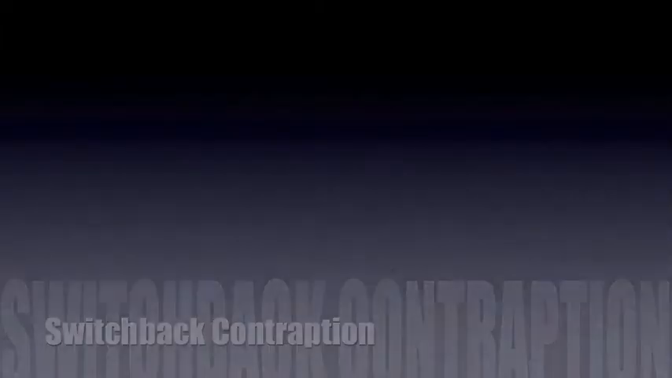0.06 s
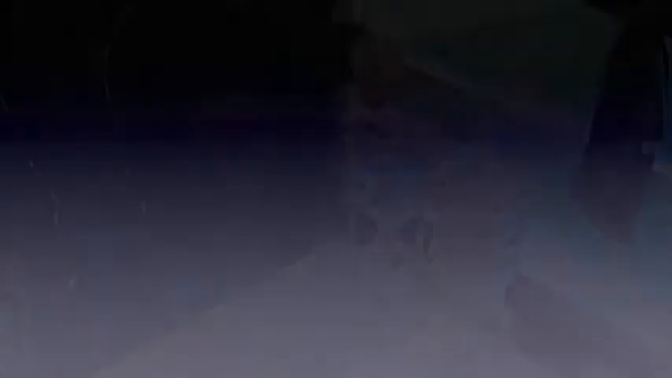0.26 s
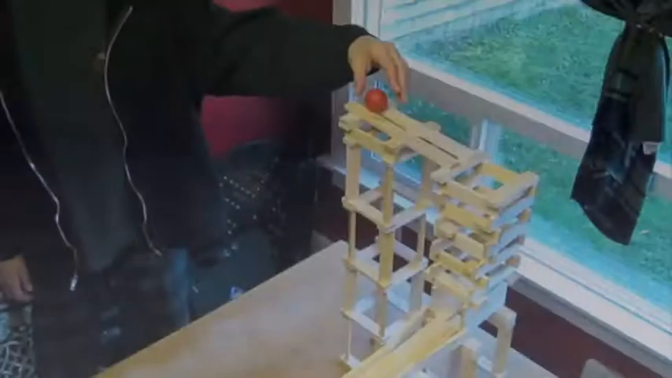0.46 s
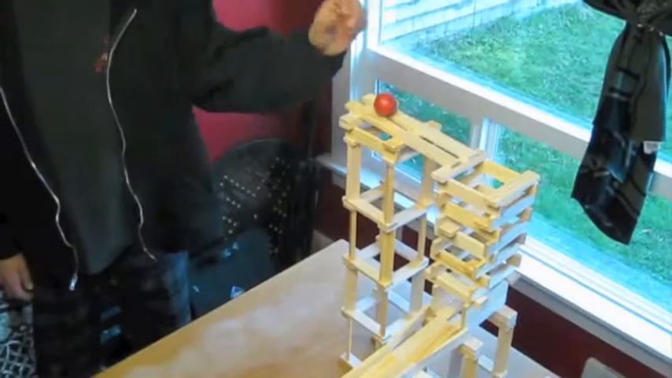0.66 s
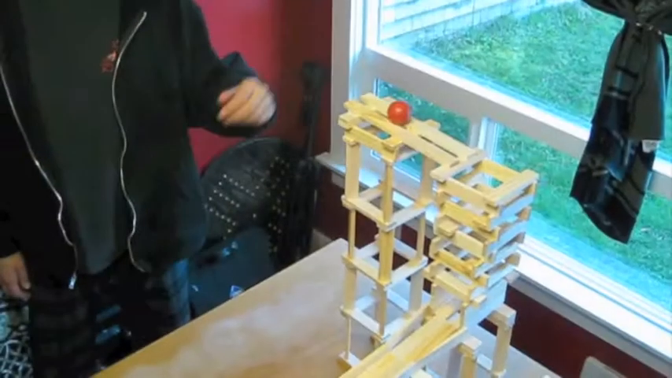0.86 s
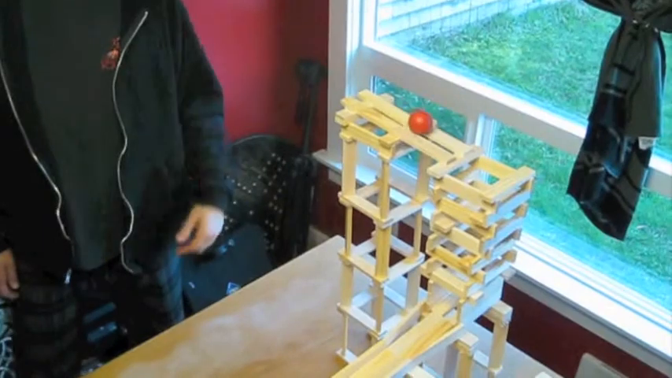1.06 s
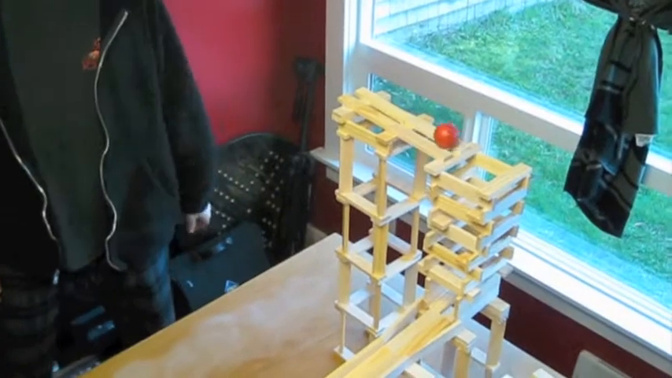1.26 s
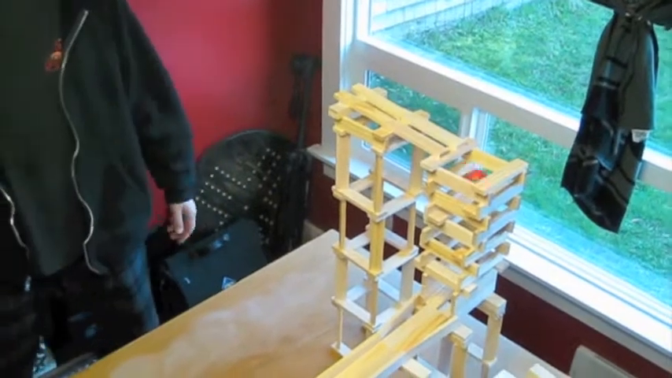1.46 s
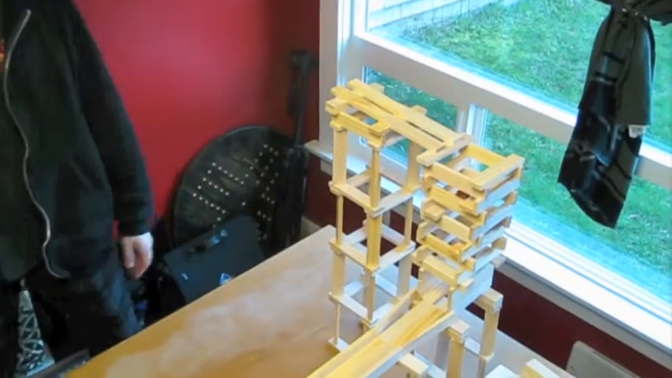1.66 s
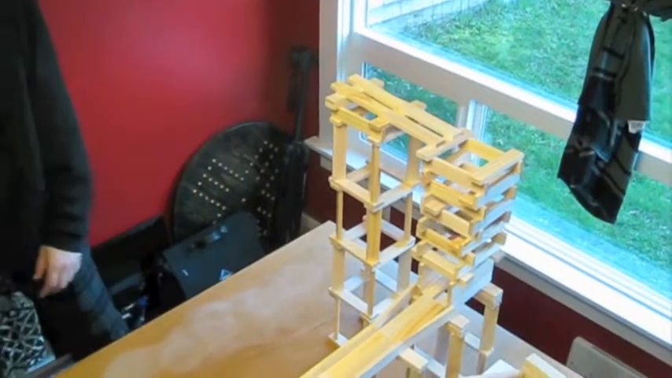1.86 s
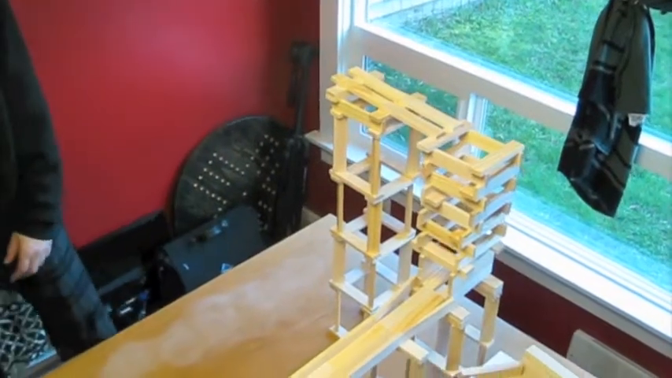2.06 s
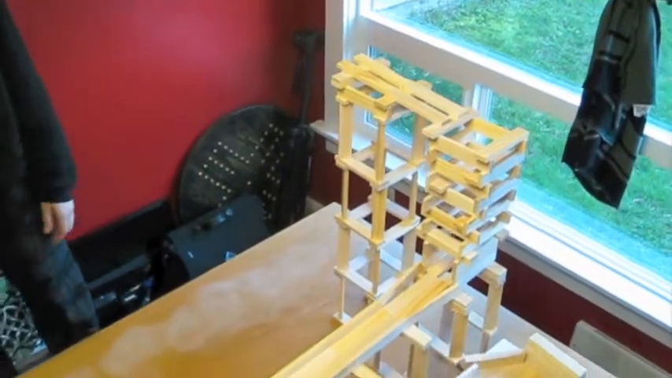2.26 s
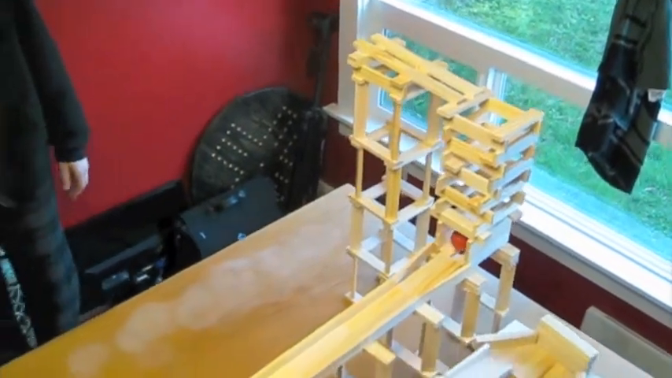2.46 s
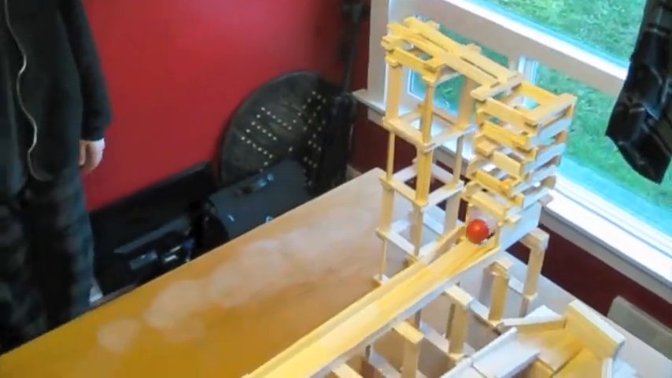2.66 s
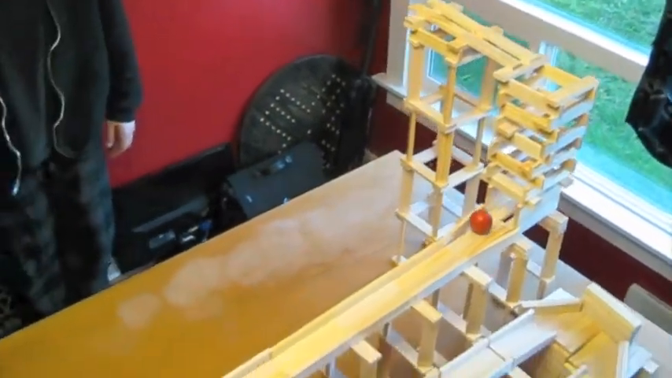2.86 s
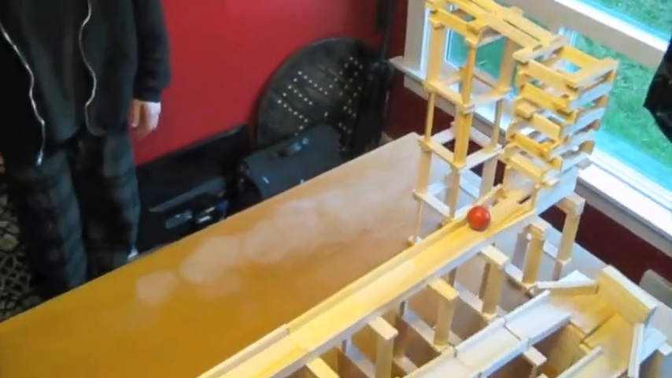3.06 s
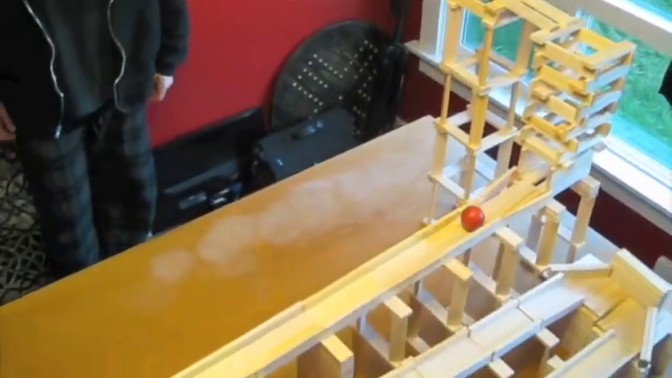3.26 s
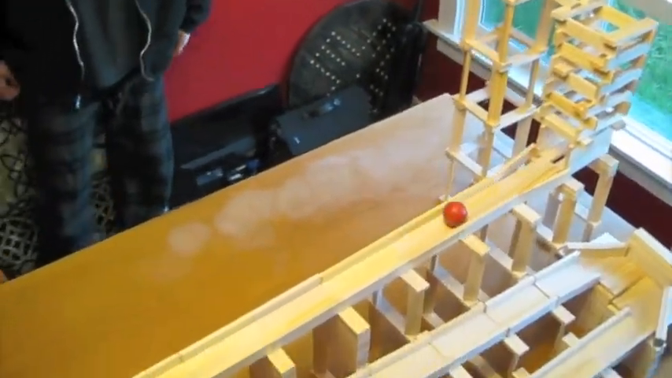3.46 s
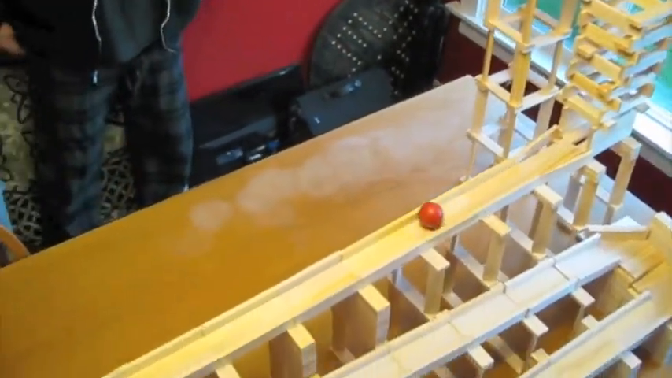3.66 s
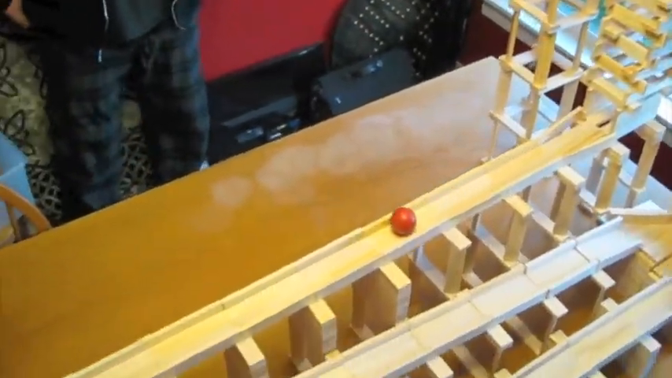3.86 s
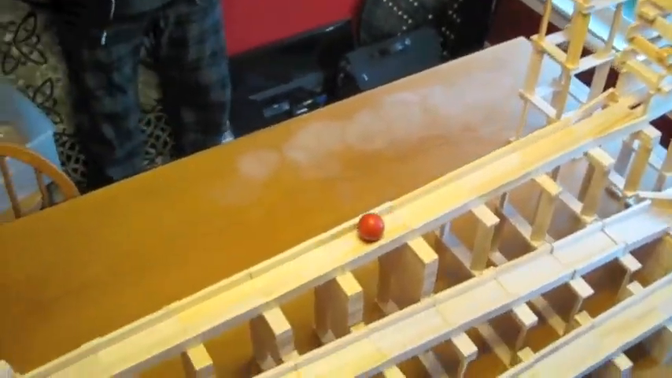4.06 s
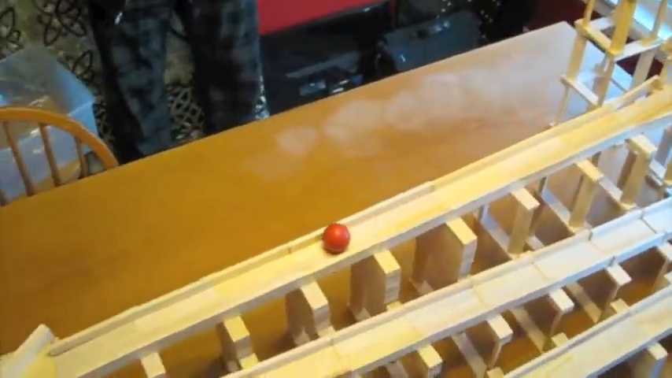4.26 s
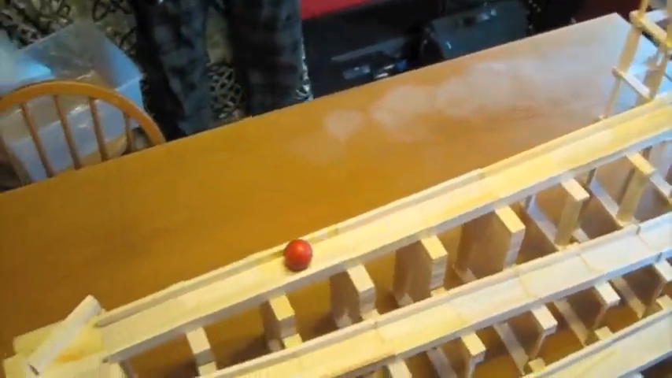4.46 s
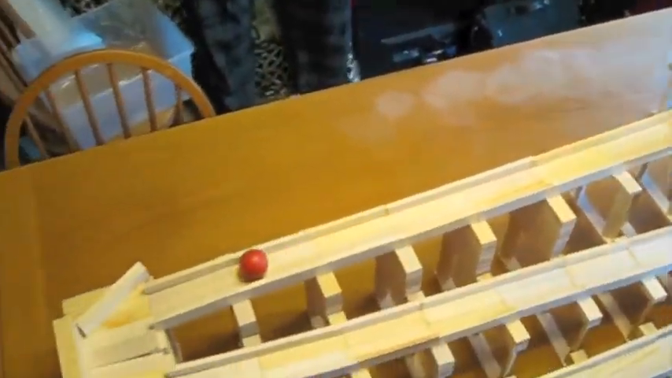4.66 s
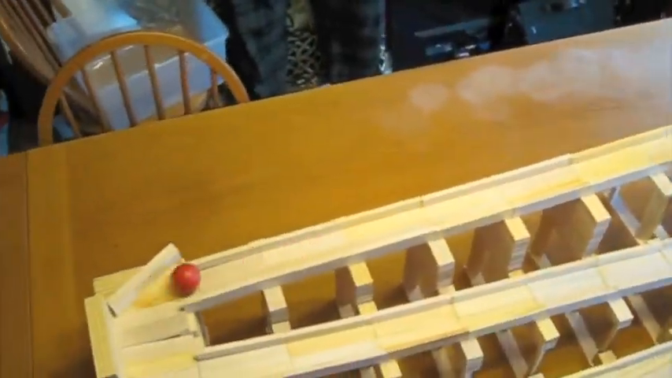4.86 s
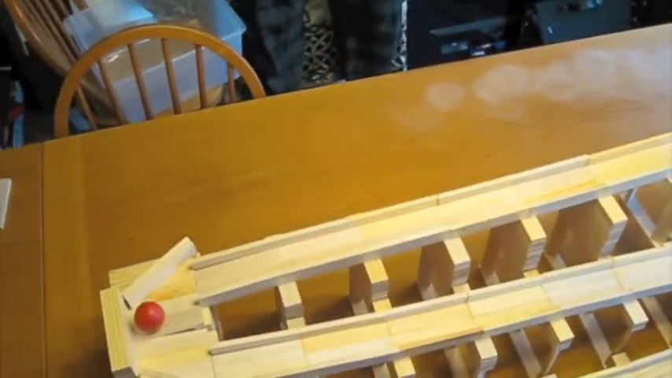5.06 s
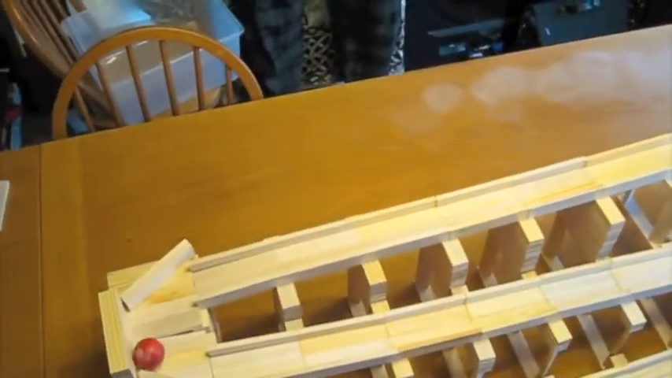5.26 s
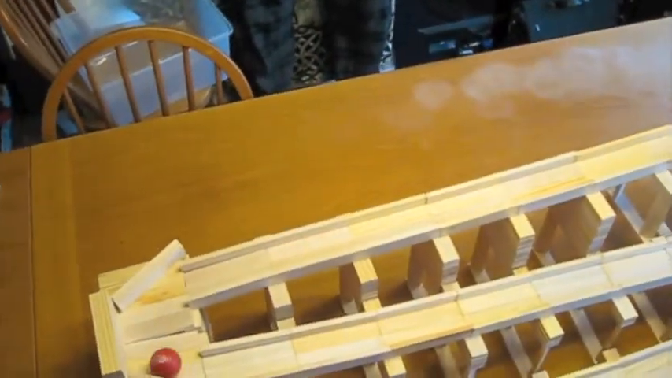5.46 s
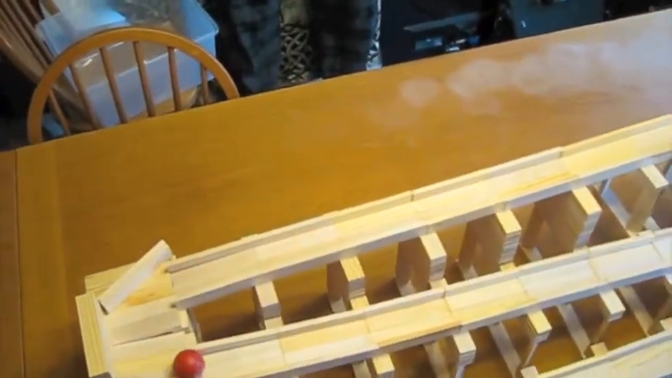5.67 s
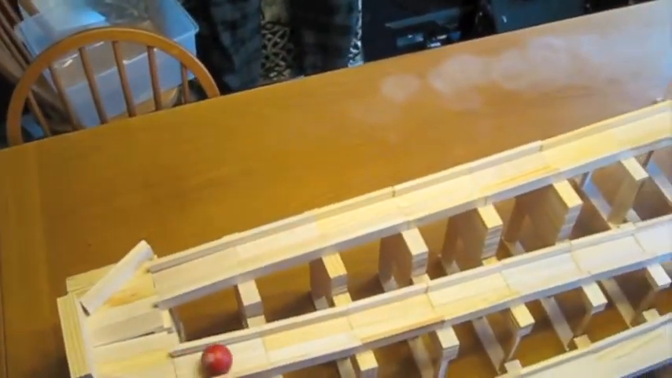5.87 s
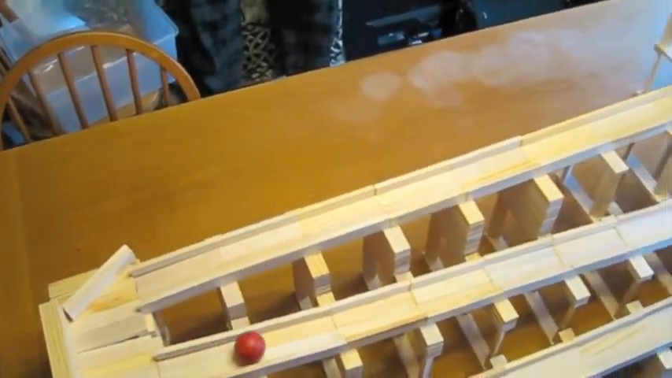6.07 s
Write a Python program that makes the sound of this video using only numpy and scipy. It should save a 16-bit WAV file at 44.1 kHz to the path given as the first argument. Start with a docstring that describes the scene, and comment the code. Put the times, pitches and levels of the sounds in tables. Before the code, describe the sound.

Sharp wooden clacks tumble quickly from shelf to shelf, bounce to rest, then a rumbling roll with knocks crosses a long plank track indoors.

```python
"""Faint hum and hiss fade in from near silence, with one tiny tick as a hand lets go of a small hard ball.
It drops from shelf to shelf down a tower of loose planks, bounces to rest, then rolls down a long ramp,
ticking over the joints, rebounds round a corner and rolls on. Each blow is a filtered noise click plus
a decaying noise tail for the small furnished room; loose planks add damped sines, and rolling is dense
random bumps through the ramp's colour."""
import sys
import numpy as np
from scipy import signal
from scipy.fft import rfft, irfft, next_fast_len
from scipy.io import wavfile
from scipy.ndimage import map_coordinates

SR = 44100
rng = np.random.default_rng(int(sys.argv[2]) if len(sys.argv) > 2 else 0)


def to_wav(sig):
    """Store sig (one row per channel, or 1-D mono) as 16-bit WAV at the path in sys.argv[1].

    Samples outside -1..1 are clipped; the rate is SR.
    """
    pcm = np.clip(np.atleast_2d(sig), -1, 1) * 32767
    pcm = np.round(pcm).astype(np.int16)
    wavfile.write(sys.argv[1], SR, pcm.T)  # frames by channels


N = 269010
SIZE = 16384  # samples in one pulse, tail or ring
FLIGHT_S = 0.0026  # travel time through the air to the microphone

# rolling level over time, shared by rumble and rail ticks: time_s, level_db
ROLL_LEVEL = [(.8, -67), (1.1, -57), (1.45, -65), (2.7, -58.5), (3.1, -62.5), (4.0, -49.5), (4.5, -47),
              (4.9, -49.5), (5.07, -41.5), (5.5, -66.5), (5.8, -65), (6.1, -60)]


def amp(db):
    """Decibels to gain."""
    return 10 ** (np.asarray(db) / 20)


def unit(x):
    """Scale to rms 1."""
    return x / np.sqrt(np.mean(x ** 2) + 1e-20)


def along(points, hz):
    """(Hz, value) points interpolated on a log frequency axis."""
    point_hz, value = np.transpose(points)
    return np.interp(np.log(hz + 1), np.log(point_hz + 1), value)


def curve(rows):
    """(s, value) rows as one value per sample."""
    return np.interp(np.arange(N) / SR, *np.transpose(rows))


def wobble(knots_per_s):
    """Smooth random curve through normal random knots."""
    knots = rng.standard_normal(int(N * knots_per_s / SR) + 4)
    return map_coordinates(knots, [np.arange(N) * knots_per_s / SR])


def filtered(x, response):
    """Multiply the spectrum of x by response(hz)."""
    m = next_fast_len(N + SIZE)
    return irfft(rfft(x, m) * response(np.fft.rfftfreq(m, 1 / SR)), m)[:N]


def causal(gain):
    """Minimum-phase pulse with this gain per frequency, by folding the cepstrum."""
    cepstrum = irfft(np.log(np.maximum(gain, 1e-6)))
    cepstrum[1:SIZE // 2] *= 2
    cepstrum[SIZE // 2 + 1:] = 0
    return irfft(np.exp(rfft(cepstrum)))


def add(track, start_s, sound):
    """Mix a sound into the track at start_s."""
    part = track[round(start_s * SR):][:len(sound)]
    part += sound[:len(part)]


def background(air_db=-52.38, drift_rad=0.93, drift_knots_per_s=3.17):
    """Steady coloured room noise plus hum sines whose phase drifts."""
    # room noise colour: freq_hz, relative density_db_per_hz
    air_colour = [(12, -43), (20, -11), (150, -6), (216, -5.5), (248, -6), (328, -5.5), (367, -4.5),
                  (897, -8), (1090, -10), (1290, -10.5), (5380, -17), (7950, -20.5), (9140, -19),
                  (13500, -21.5), (16000, -24)]
    # hum partials: freq_hz, rms level_db
    hum_partials = [(247.6, -69.5), (371.4, -68), (532.9, -68.5), (780.6, -74.5)]
    t = np.arange(N) / SR
    air = unit(filtered(rng.standard_normal(N), lambda hz: amp(along(air_colour, hz))))
    hum = np.zeros(N)
    for hz, level_db in hum_partials:
        phase = 2 * np.pi * hz * t + drift_rad * wobble(drift_knots_per_s)
        hum += amp(level_db) * np.sqrt(2) * np.sin(phase)
    return amp(air_db) * air + hum


def room_tail(build_s=0.00023):
    """Fresh diffuse answer of table and walls, energy 1: noise whose treble dies first."""
    # room decay: freq_hz, t60_s
    room_decay = [(150, 0.38), (500, 0.26), (1400, 0.25), (3500, 0.23), (7000, 0.2), (14000, 0.18)]
    hz, t, z = signal.stft(rng.standard_normal(SIZE), SR, nperseg=256)
    decay = amp(-60 * t / along(room_decay, hz)[:, None])
    tail = signal.istft(z * decay, SR, nperseg=256)[1][:SIZE]
    tail = tail * (1 - np.exp(-np.arange(SIZE) / SR / build_s))
    return tail / np.linalg.norm(tail)


def rolling(bumps_per_s=550, wet_db=3, uneven_db=1.24, uneven_knots_per_s=22.12):
    """The ball rides over the wood grain: dense tiny bumps sound through the ramp."""
    # ramp colour under the ball: freq_hz, relative density_db_per_hz
    ramp_colour = [(120, -38), (200, -10), (390, -3), (475, -11), (596, -5), (858, -6), (1200, -4.5),
                   (1330, -7.5), (1860, -6.5), (2130, -17.5), (2720, -11), (6160, -23), (7500, -26),
                   (9750, -60), (16500, -120)]
    bumps = (rng.random(N) < bumps_per_s / SR) * rng.standard_normal(N)
    bumps = bumps + amp(wet_db) * signal.fftconvolve(bumps, room_tail())[:N]
    rumble = unit(filtered(bumps, lambda hz: amp(along(ramp_colour, hz))))
    return rumble * amp(curve(ROLL_LEVEL) + uneven_db * wobble(uneven_knots_per_s))


def grit(ticks_per_s=160, level_db=-14, centre_hz=12300, width_hz=3000, patchy_db=4, wet_db=0):
    """The ball brushes the side rails: patchy, thin, airy ticks that follow the rolling level."""
    ticks = (rng.random(N) < ticks_per_s / SR) * rng.standard_normal(N)
    ticks = ticks * amp(patchy_db * wobble(28))
    ticks = ticks + amp(wet_db) * signal.fftconvolve(ticks, room_tail())[:N]
    airy = unit(filtered(ticks, lambda hz: 1 / (1 + ((hz - centre_hz) / width_hz) ** 4)))
    return airy * amp(curve(ROLL_LEVEL) + level_db)


def release(start_s=0.481, level_db=-33, pitch_hz=3200, width_oct=0.67, life_s=0.0021):
    """One tiny dry tick as the hand lets go: a band-passed, decaying noise burst."""
    out, t = np.zeros(N), np.arange(SIZE) / SR
    add(out, start_s, amp(level_db) * rng.standard_normal(SIZE) * np.exp(-t / life_s))
    return filtered(out, lambda hz: 2 / (1 + (np.log2((hz + 1) / pitch_hz) / width_oct) ** 4))


def contacts(first_bounce_s=0.1075, shrink=0.7, loss_db=4, softer_db=1.4):
    """Every blow: single hits, then the last drop's bounces, each sooner, weaker and softer."""
    # single blows: start_s, relative level_db, hardness_db, plank
    hits = [(.923, -31, -6, "runway"), (1.015, -40.5, -31, "runway"), (1.202, -34.5, -15, "runway"),
            (1.454, -38, -6, "ramp"), (1.543, -21.5, 7, "shelf 1"), (1.608, -29.5, -4, "shelf 1"),
            (1.694, -23, 11, "shelf 2"), (1.727, -30, 5.5, "shelf 2"), (1.772, -28.5, -1.5, "post"),
            (1.826, -29, -0.5, "ramp"), (1.834, -22, -5, "shelf 3"), (1.917, -40, -11, "shelf 3"),
            (1.973, -21, -13, "shelf 4"), (2.044, -19, -10, "shelf 4"), (2.136, -24, -11.5, "shelf 4"),
            (2.223, -30.5, -4.5, "shelf 5"), (2.244, -16.5, -1, "shelf 5"), (2.358, -33.5, -12, "shelf 4"),
            (2.975, -53, -10, "ramp"), (3.203, -40.5, -17.5, "ramp"), (3.566, -38, -30, "runway"),
            (3.715, -41.5, -19, "lower ramp"), (3.804, -27.5, -21.5, "loose joint"),
            (3.834, -27, -21, "loose joint"), (4.04, -33.5, -20.5, "lower ramp"),
            (4.06, -39.5, -20, "lower ramp"), (4.284, -50, -12, "side rail"),
            (4.297, -49, -15, "side rail"), (4.386, -37.5, -13, "lower ramp"),
            (4.433, -51, -12, "side rail"), (4.451, -27.5, -24.5, "lower ramp"),
            (4.57, -34.5, -21, "lower ramp"), (4.61, -22, -20, "lower ramp"), (4.646, -29, -14, "ramp end"),
            (4.669, -29.5, -24, "ramp end"), (4.78, -29.5, -21.5, "lower ramp"),
            (4.823, -26.5, -16.5, "lower ramp"), (4.954, -29.5, -20, "lower ramp"),
            (4.975, -26.5, -30, "lower ramp"), (4.991, -21.5, -11.5, "corner"),
            (5.095, -21, -5, "corner wall"), (5.281, -22.5, -18, "corner floor"),
            (5.318, -25, -27, "corner floor"), (5.33, -30, -19.5, "corner floor"),
            (5.362, -31, -6.5, "exit"), (5.73, -48.5, -21, "ramp"), (5.868, -46, -11, "ramp")]
    # last drop, out of the tower: start_s, relative level_db, hardness_db
    drop = (2.401, -16.5, -3)
    # plank under each bounce
    bounce_path = ["chute", "chute", "ramp head", "ramp head", "ramp head"]
    start_s, level_db, hard_db = drop
    bounces = []
    for k, plank in enumerate(bounce_path):
        flown_s = first_bounce_s * sum(shrink ** j for j in range(k))
        bounces.append((start_s + flown_s, level_db - loss_db * k, hard_db - softer_db * k, plank))
    return hits + bounces


def thumps(attack_s=0.0024):
    """Each blow swings the table top's low modes, more the stronger and harder it is."""
    # low table modes: freq_hz, level_db relative to the blow, t60_s
    table_modes = [(70.7, -35.5, .3), (167, -31.5, 0.27)]
    out, t = np.zeros(N), np.arange(SIZE) / SR
    swing = np.zeros(SIZE)
    for hz, mode_db, t60_s in table_modes:
        swing += amp(mode_db) * np.sin(2 * np.pi * hz * t) * np.exp(-np.log(1000) * t / t60_s)
    swing *= 1 - np.exp(-t / attack_s)
    for start_s, level_db, hard_db, _ in contacts():
        add(out, start_s + FLIGHT_S, amp(level_db + hard_db) * swing)
    return out


def ringing(level_db=-1.0, hard_share=0.52, waver=1.0, waver_knots_per_s=110, attack_s=0.00073):
    """Bending modes of loose planks; reflections make their level and phase waver."""
    # modes by plank: freq_hz, level_db relative to the drive, t60_s
    plank_modes = {"shelf 1": [(3040, -8.5, .085), (3280, -19, 0.69), (6480, -15, 0.23)],
                   "shelf 2": [(2507, -2, 0.46), (2600, -4, 0.25), (6370, -11, 0.21)],
                   "post": [(4040, -1, 0.11)], "shelf 3": [(3574, 2.5, 0.2), (3870, -6, .082),
                   (6600, -9.5, .22)], "shelf 4": [(1378, 0.5, .09), (1575, -4, .11), (2560, -10, 0.12),
                   (2900, 0, 0.099), (3320, -10, 0.1)], "chute": [(2880, -10, 0.25)],
                   "ramp head": [(2878, -0.5, 0.21), (3370, -8.5, 0.23)],
                   "loose joint": [(3800, -8.5, 0.16), (4200, -6, 0.13), (4360, -11, .11)],
                   "ramp end": [(2640, 7.5, 0.16)], "corner": [(310, -14.5, .18), (1120, -3, 0.32),
                   (3350, 16.5, 0.019), (3710, 8, 0.028)], "corner wall": [(1840, -5, 0.027),
                   (2230, 9, 0.023)], "corner floor": [(2890, -1, 0.1)], "exit": [(2400, -3, 0.21),
                   (3730, -4.5, .21), (3940, -3, 0.16), (6000, -8, .14)]}
    out, t = np.zeros(N), np.arange(SIZE) / SR
    for start_s, blow_db, hard_db, plank in contacts():
        drive = amp(level_db + blow_db + hard_share * hard_db) * (1 - np.exp(-t / attack_s))
        for hz, mode_db, t60_s in plank_modes.get(plank, []):
            knots = rng.standard_normal((2, 256))
            a, b = [map_coordinates(k, [t * waver_knots_per_s], mode="mirror") for k in knots]
            in_phase = (1 + waver * a) * np.sin(2 * np.pi * hz * t)
            tone = in_phase + waver * b * np.cos(2 * np.pi * hz * t)
            decay = np.exp(-np.log(1000) * t / t60_s)
            add(out, start_s + FLIGHT_S, amp(mode_db) * drive * tone * decay)
    return out


def blows(click_db=22, room_db=24, chatter=0.17, chatter_s=0.00078, contact_s=0.00042,
          width_oct=0.21, bright_db=5.5, clack_db=3, clack_share=0.26, table_s=0.001208):
    """Each blow is a sharp clack of about a millisecond, then the room's answer from the same pulse."""
    # thud, knock, clack, snap, tick: low_hz, high_hz
    bands = [(200, 700), (700, 2000), (2000, 4500), (4500, 7500), (8500, 15500)]
    # colour common to all blows on wood: freq_hz, gain_db
    wood_colour = [(60, -20), (190, -16.5), (340, -2.5), (600, -2.5), (1200, -1), (2000, -2.5),
                   (3200, -4.5), (5500, -5.5), (7200, -6.5), (9500, -10.5), (12000, -4.5), (16000, -13.5)]
    # table top (low) and hard contact (high) resonances: centre_hz, width_hz, boost_db
    body = [(73, 13, 9.5), (253.4, 48, 7), (363, 18, 4.5), (419, 20, 9), (495, 14, 3.5), (633, 82, 4),
            (6900, 120, 2), (8960, 220, 9.5), (10300, 290, 8), (12170, 390, 1.5), (13500, 440, 1.5),
            (15300, 350, -9.5)]
    # by plank: resonance_hz, boost_db, thud_db re blow, tick_db re hardness-raised level
    planks = {"runway": (1600, 4.5, -14, -9), "shelf 1": (3052, 10, -7.5, -2.5),
              "shelf 2": (2491, 7, -4, -14), "post": (4104, 11.5, -9, 2), "shelf 3": (3620, 11.5, -4.5, 0),
              "shelf 4": (1295, 6, -8.5, 11.5), "shelf 5": (4400, 8, -13.5, 1),
              "chute": (1078, 1, -12.5, -4), "ramp head": (2850, 3, -10.5, 0),
              "side rail": (1600, 2, -17, 24), "ramp": (1094, 6.5, -2, 3.5),
              "loose joint": (1000, -1, -12.5, -0.5), "lower ramp": (1403, 0, -27.5, 7),
              "ramp end": (2450, 7, -29, 8), "corner": (1130, -8, -20, 15.5),
              "corner wall": (2222, 4, -23, 8), "corner floor": (1200, 2.5, -16.5, 9),
              "exit": (1230, 1, -15.5, 9.5)}
    out, t, hz = np.zeros(N), np.arange(SIZE) / SR, np.fft.rfftfreq(SIZE, 1 / SR)
    low_hz, high_hz = np.transpose(bands)
    mid_hz = np.sqrt(low_hz * high_hz)
    wood_db = along(wood_colour, hz)
    for centre_hz, width_hz, boost_db in body:
        wood_db = wood_db + boost_db / (1 + (2 * (hz - centre_hz) / width_hz) ** 2)
    # the direct path keeps more treble
    direct = amp(along([(1500, 0), (10000, bright_db)], hz))
    for start_s, level_db, hard_db, plank in contacts():
        plank_hz, boost_db, thud_db, tick_db = planks[plank]
        # the harder the blow, the more of the upper bands
        rise_db = [thud_db, 0, clack_db + clack_share * hard_db, hard_db, hard_db + tick_db]
        density_db = level_db + np.array(rise_db) - 10 * np.log10((high_hz - low_hz) / (SR / 2))
        # broad, heavily damped resonance of this plank
        plank_db = boost_db / (1 + (np.log2((hz + 1) / plank_hz) / width_oct) ** 2)
        pulse = causal(amp(along(np.c_[mid_hz, density_db], hz) + wood_db + plank_db))
        # force builds up, then the plank chatters on its supports
        force = rng.standard_normal(SIZE) * (1 - np.exp(-t / contact_s)) * np.exp(-t / chatter_s)
        spread = rfft(force)
        # keep the force's phase, flatten most of its magnitude
        spread = spread / (np.abs(spread) + 1e-9) ** (1 - chatter)
        click = irfft(rfft(pulse) * direct * spread)[:SIZE // 2]
        click = np.linalg.norm(pulse) * click / np.linalg.norm(click)
        add(out, start_s + FLIGHT_S, amp(click_db) * click)
        # the answer starts with the reflection off the table, table_s after the direct sound
        answer = signal.fftconvolve(pulse, room_tail())[:SIZE]
        add(out, start_s + FLIGHT_S + table_s, amp(room_db) * answer)
    return out


def scene():
    """Ball, planks, table and room at one microphone."""
    ball = rolling() + grit() + release() + thumps() + ringing() + blows()
    return (background() + ball)[None]


def record(dry, notch_hz=7900, notch_width_hz=1700, top_hz=15900):
    """Fade in, then the recorder's deep treble notch and band limit."""
    # fade-in, last gain held: time_s, gain
    fade = [(.27, 0.0056), (.35, 0.088), (.5, 0.31), (.65, 0.49), (.8, 0.74)]

    def response(hz):
        gap = notch_hz ** 2 - hz * hz
        notch = gap / (gap + 1j * hz * notch_width_hz)
        return notch * (hz < top_hz)

    return filtered(dry[0] * curve(fade), response)[None]


dry = scene()
out = record(dry)
to_wav(out)
```